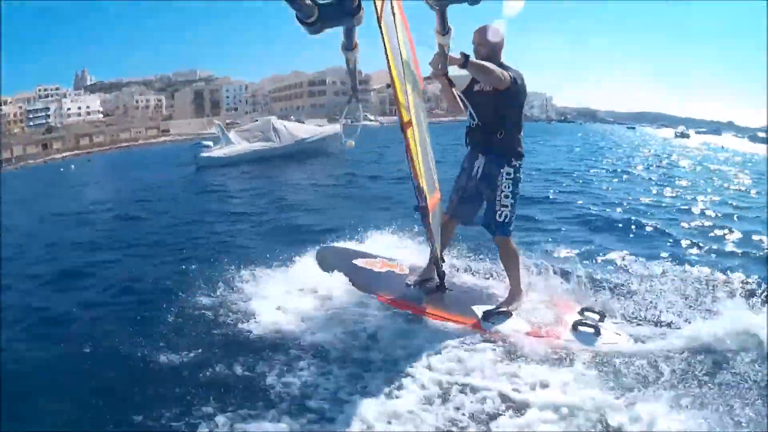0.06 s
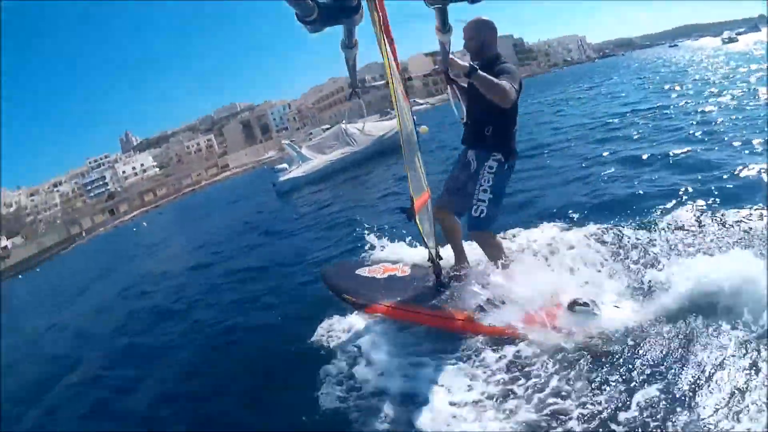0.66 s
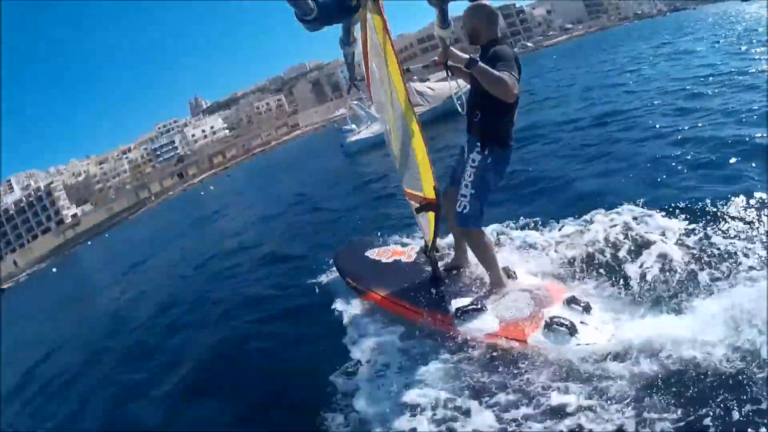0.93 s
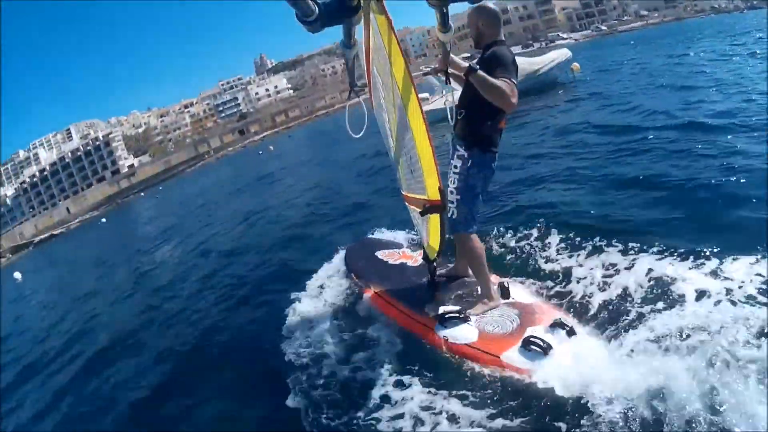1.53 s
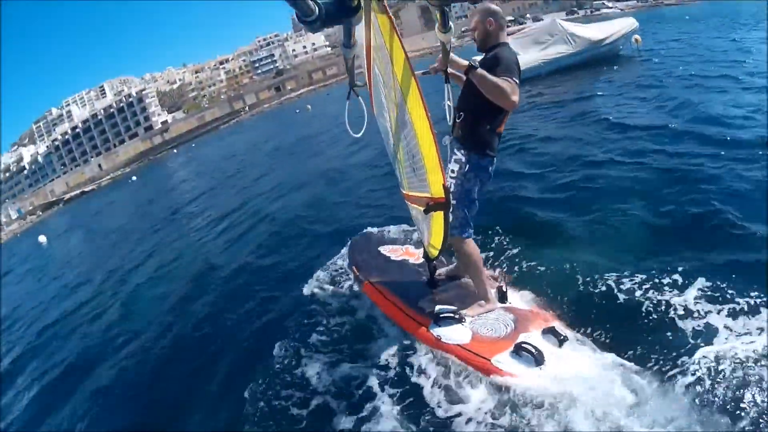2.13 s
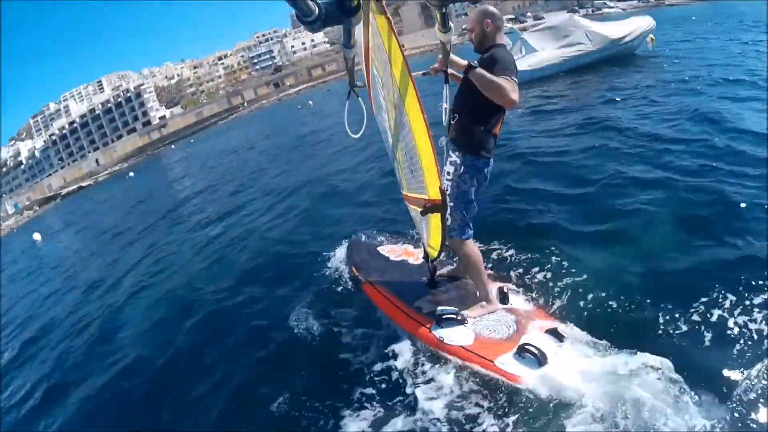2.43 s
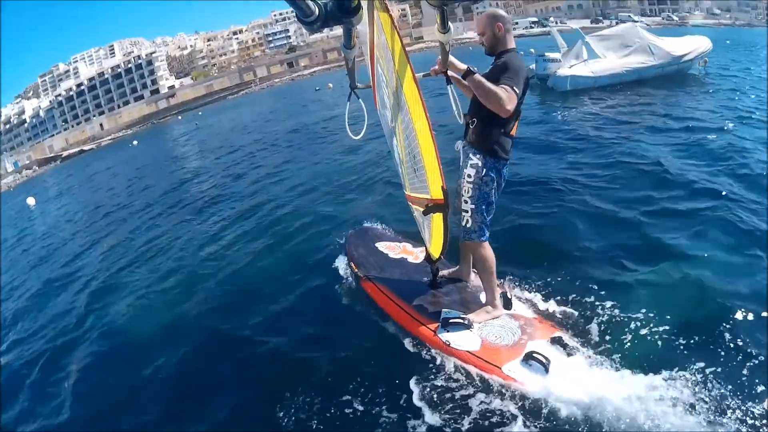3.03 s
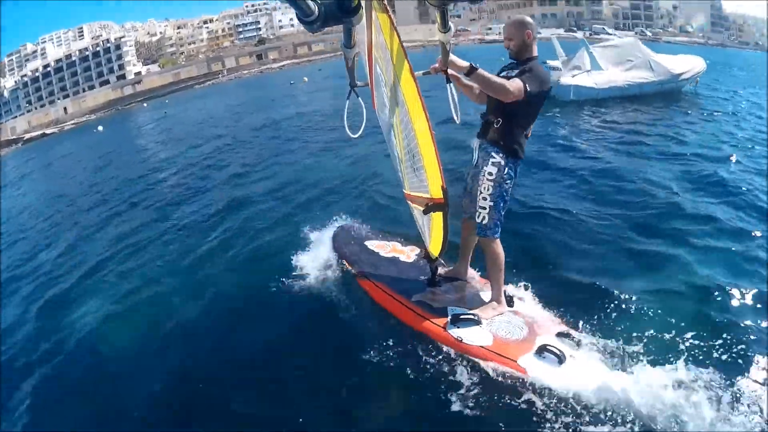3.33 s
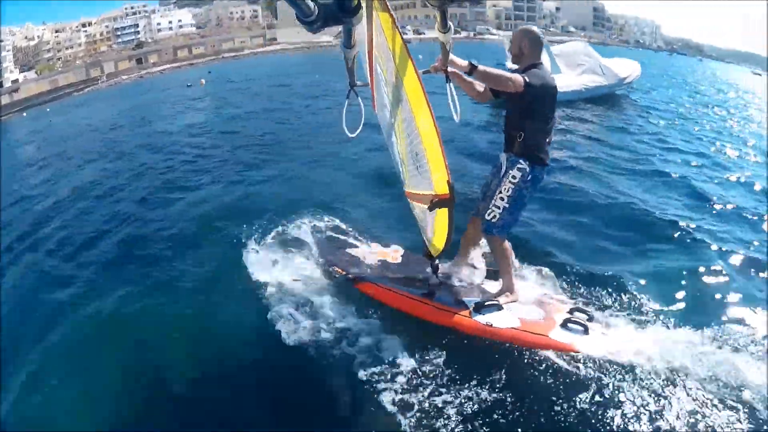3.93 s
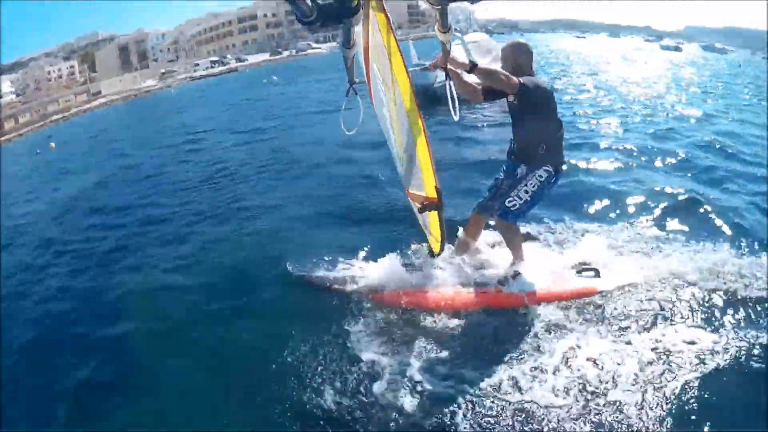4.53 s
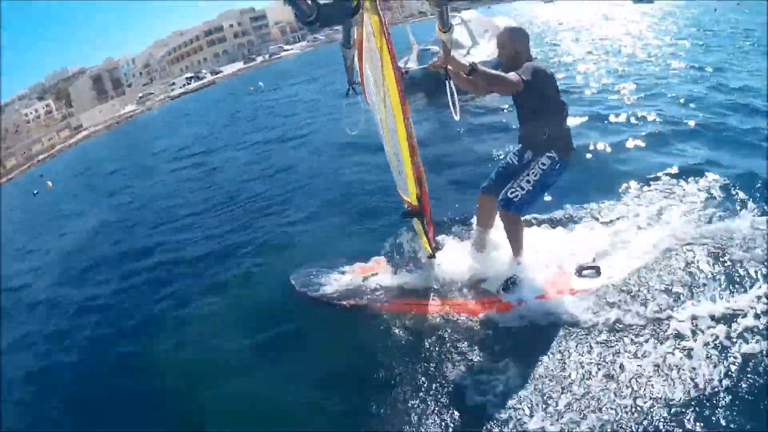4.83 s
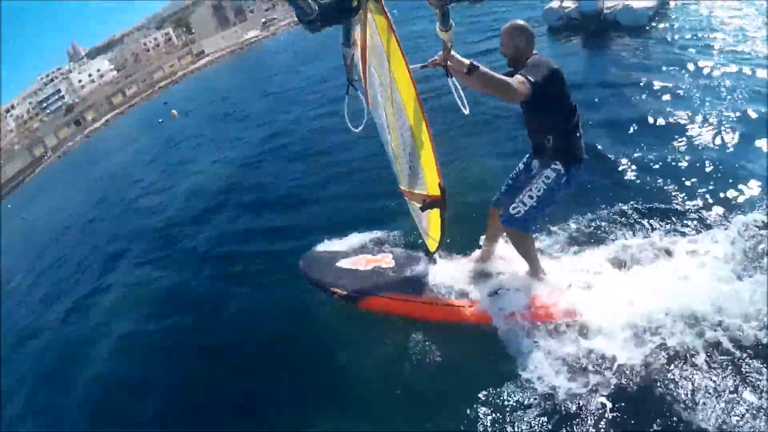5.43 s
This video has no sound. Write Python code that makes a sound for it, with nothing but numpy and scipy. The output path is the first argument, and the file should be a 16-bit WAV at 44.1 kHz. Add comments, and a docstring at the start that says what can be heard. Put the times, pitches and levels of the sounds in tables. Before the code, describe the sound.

A windsurf board skims over small chop on open water, heard from a sealed camera on the rig. Churning wash and buffeting wind come first, with hollow knocks through the mast, sharp drop ticks and small plops. The water and hiss then calm, broken by a short clatter. Later the rigging whistles faintly and knocks build to a crackling landing, then thin out over soft wash and wind.

```python
"""A windsurf board skims over small chop, heard from a sealed camera clamped to the rig.
It opens in churning wash and buffeting wind, with a run of knocks that travel up the mast as bending
waves and ring its hollow modes; drops tick on the case and air pockets plop under the hull. The ride
calms, the hiss steps down near 1.4 s, and a short clatter comes near 2.3 s. Near 4 s the rigging whistles
faintly and the knocks build to a crackling landing at 4.6 s, then thin out over wash, wind and hiss."""
import sys
import numpy as np
from scipy import signal
from scipy.fft import rfft, irfft, next_fast_len
from scipy.io import wavfile
from scipy.ndimage import uniform_filter1d, map_coordinates

SR = 44100
rng = np.random.default_rng(int(sys.argv[2]) if len(sys.argv) > 2 else 0)


def put_to_file(sound):
    """Save the sound as 16-bit audio at rate SR, in the file named by the first command-line argument."""
    columns = np.atleast_2d(sound).T  # one column per channel
    safe = np.clip(columns, -1, 1)
    whole_steps = np.round(safe * 32767)
    wavfile.write(sys.argv[1], SR, whole_steps.astype(np.int16))


N = 250047

# airflow over the case, rising and falling with the board's speed: (time [s], buffet level [dB])
AIRFLOW = [(0, -26.5), (0.15, -40), (0.38, -43), (0.55, -34), (0.81, -40), (0.91, -21.5), (1.02, -23),
           (1.15, -32.5), (1.72, -51.5), (2.2, -46), (2.62, -59.5), (3.5, -49), (3.85, -51.5), (4.25, -45),
           (4.72, -45), (5.03, -49.5), (5.3, -37.5), (5.67, -46)]
CRUISE_DB = -45  # an ordinary airflow


def amp(db):
    """Decibels to gain."""
    return 10 ** (np.asarray(db) / 20)


def unit(x):
    """Scale to rms 1."""
    return x / np.sqrt(np.mean(x ** 2) + 1e-20)


def along(points, hz):
    """Read (frequency [Hz], value) points on a log frequency axis."""
    freqs, values = np.transpose(points)
    return np.interp(np.log(hz + 1), np.log(freqs + 1), values)


def envelope(points):
    """Join (time [s], value) points into one value per sample."""
    times, values = np.transpose(points)
    return np.interp(np.arange(N) / SR, times, values)


def wobble(rate):
    """A smooth random curve, rate knots a second."""
    knots = rng.standard_normal(int(N * rate / SR) + 4)
    return map_coordinates(knots, [np.arange(N) * rate / SR])


def filtered(x, response):
    """Filter x with a complex response, given as a function of frequency."""
    size = 2 * next_fast_len(N // 2 + SR // 4)
    return irfft(rfft(x, size) * response(np.fft.rfftfreq(size, 1 / SR)), size)[:N]


def causal(gain):
    """The response with this gain that starts at once and then rings out."""
    cepstrum = irfft(np.log(gain + 1e-9))
    size = len(cepstrum)
    return np.exp(rfft(2 * cepstrum[:size // 2], size) - cepstrum[0])


def add(track, sound, s):
    """Mix a sound into the track from s seconds on."""
    start = round(s * SR)
    piece = sound[max(-start, 0):N - start]
    track[max(start, 0):][:len(piece)] += piece


def rush(spectrum, patchy_db):
    """Coloured noise of rms 1, with random patches of gain across time and frequency."""
    frames = signal.stft(rng.standard_normal(N), nperseg=512)[2]
    patches = uniform_filter1d(rng.standard_normal(frames.shape), size=5, axis=0)
    patches = uniform_filter1d(patches, size=9, axis=1)
    noise = signal.istft(frames * amp(patchy_db * unit(patches)), nperseg=512)[1][:N]
    return unit(filtered(noise, lambda hz: amp(along(spectrum, hz))))


def patter(rate, spread_db):
    """Random tiny impacts of uneven size, rate a second."""
    hits = rng.random(N) < rate / SR
    return hits * rng.standard_normal(N) * amp(spread_db * rng.standard_normal(N))


def rig(hz, vary_db):
    """Gain of the rig's modes; each place of impact drives them a little differently, by vary_db."""
    # modes of mast, boom and camera mount: (frequency [Hz], level [dB], t60 [s])
    modes = [(30, -6.5, 0.22), (56.1, -9, 0.076), (93.3, -5.5, 0.28), (133, -2, 0.13), (227.4, -7, 0.14),
             (297.7, 2, 0.11), (340.3, -5, 0.24), (437, -5, 0.066), (505.4, 3.5, 0.068), (573, -7, 0.046),
             (644, -10.5, 0.071), (808.5, -4, 0.056), (960, 1, 0.066), (1024, -3.5, 0.068),
             (1080, -11.5, 0.027), (1162, -6, 0.036), (1457, -5.5, 0.02), (1573, -19.5, 0.069),
             (1847, -18.5, 0.017), (2240, -31.5, 0.0086), (2680, -38.5, 0.013), (3500, -44, 0.03),
             (4000, -38.5, 0.016)]
    # share of a blow that the mast carries to the camera: (frequency [Hz], gain [dB])
    mast_eq = [(15, -19.5), (30, -4), (80, 4.5), (1700, 1.5), (2200, -1.5), (2700, -5.5), (3600, -1.5),
               (4300, -13), (5500, -38), (16000, -62)]
    power = 0
    for mode_hz, db, t60 in modes:
        offset = (hz - mode_hz) * 2 * np.pi * t60 / np.log(1000)  # in half-widths
        peak = 1 / (1 + offset ** 2) / np.sqrt(1 + (offset / 3) ** 2)  # steep skirts, dark valleys
        power = power + amp(db + vary_db * rng.standard_normal()) ** 2 * peak
    return np.sqrt(power) * amp(along(mast_eq, hz))


def bending(hz, delay_at_1khz=.004):
    """Bending waves are faster at high pitch, so a blow arrives as a quick downward chirp."""
    phase = 4 * np.pi * delay_at_1khz * np.sqrt(1000 * hz)
    # paths of unequal length blur the front of the higher waves over a few milliseconds
    blur = map_coordinates(rng.standard_normal(90), [hz / 260]) * np.minimum(hz / 750, 1.8)
    return np.exp(-1j * (phase + blur))


def blow(drive, size, scatter_db=-6.5, scatter_t60=.035, level_window_s=.005):
    """One hit through the mast: the direct wave, then a cloud of weak reflections from the fittings."""
    hz, t = np.fft.rfftfreq(size, 1 / SR), np.arange(size) / SR
    echoes = rng.standard_normal(size) * amp(-60 * t / scatter_t60)
    paths = 1 + amp(scatter_db) * rfft(echoes / np.linalg.norm(echoes))
    hit = irfft(causal(drive) * paths * bending(hz))
    gain = np.sqrt(level_window_s * SR)  # a hit's level is its energy spread over this window
    return gain * np.roll(hit, size // 32)  # pre-roll keeps the blurred attack whole


def hiss_and_whistle(whistle_hz=3630, half_width_hz=210, flutter_db=0.82):
    """Fine hiss of spray and recorder, with a faint airy whistle in the rigging."""
    # fine hiss, stepping down near 1.4 s as the camera's microphone switches: (time [s], level [dB])
    hiss_levels = [(0, -48), (0.28, -48), (0.5, -54), (0.72, -50.5), (0.98, -48), (1.36, -50.5),
                   (1.45, -58.5), (3.1, -60), (4.3, -57), (4.52, -50.5), (4.7, -56.5), (5.05, -57.5),
                   (5.2, -54.5), (5.67, -53.5)]
    # colour of the hiss: (frequency [Hz], spectral level [dB])
    hiss_eq = [(300, 3), (600, -1), (1000, -9.5), (1500, -7), (2300, -9), (3700, -14), (5200, -16.5),
               (8200, -18.5), (10200, -16.5), (12000, -20), (14800, -22.5), (16000, -25.5)]
    # the rigging's whistle, which returns once the board is on its new course: (time [s], level [dB])
    whistle_levels = [(0, -67), (1.6, -84.5), (3.85, -78), (4.1, -66), (4.6, -69), (5.0, -80), (5.3, -67),
                      (5.67, -64.5)]
    resonance = lambda hz: 1 / (1 + ((hz - whistle_hz) / half_width_hz) ** 2)
    whistle = unit(filtered(rng.standard_normal(N), resonance))
    hiss = rush(hiss_eq, patchy_db=.6)
    hiss_db = envelope(hiss_levels) + flutter_db * wobble(21)
    whistle_db = envelope(whistle_levels) + wobble(12)
    return amp(hiss_db) * hiss + amp(whistle_db) * whistle


def wind(cruise_sway_db=-47.5, sway_db_per_db=1.134):
    """Lumpy air pressure buffets the case and sways the rig's lowest modes."""
    # rumble of air on the case: (frequency [Hz], spectral level [dB])
    buffet_eq = [(12, -24), (28, 10), (50, -13), (70, -6), (110, -10.5), (200, -30), (400, -51.5),
                 (900, -81)]
    # the air pushes too slowly to drive the higher modes: (frequency [Hz], gain [dB])
    push = [(40, -28), (60, -5.5), (90, 0.5), (140, -0.5), (200, -7), (300, -15.5), (500, -27.5),
            (1000, -45.5)]
    buffet_db = envelope(AIRFLOW)
    sway_db = cruise_sway_db + sway_db_per_db * (buffet_db - CRUISE_DB)
    low_modes = lambda hz: rig(hz, vary_db=0) * amp(along(push, hz))
    sway = unit(filtered(rng.standard_normal(N), low_modes))
    buffet = rush(buffet_eq, patchy_db=-1.5)
    return amp(buffet_db) * buffet + amp(sway_db) * sway


def churn(cruise_wake_db=-58.5, wake_db_per_db=0.55, rise_s=.04):
    """Envelope of the wash: a wake that follows the speed, plus a surge for each wave."""
    # waves the board ploughs through: (start [s], level [dB], hold from start [s], fall [dB/s])
    surges = [(-0.02, -21, 0.043, 126), (0.198, -31.5, 0.068, 68.5), (0.464, -30, 0.27, 190),
              (0.816, -26.5, 0.16, 49), (0.86, -16.5, 0.023, 150), (1.088, -33, 0.088, 89.5),
              (4.1, -45.5, 0.04, 70), (4.57, -46.5, 0.14, 20), (5.096, -40.5, 0.055, 82),
              (5.287, -39.5, 0.032, 49)]
    t = np.arange(N) / SR
    power = amp(cruise_wake_db + wake_db_per_db * (envelope(AIRFLOW) - CRUISE_DB)) ** 2
    for start, db, hold, fall in surges:
        rise = np.clip((t - start) / rise_s, 0, 1)
        surge = rise * amp(db - fall * np.maximum(t - start - hold, 0))
        power = power + surge ** 2
    return np.sqrt(power)


def wash(gurgle_db=1.76, foam_db=-7):
    """Water churns against the hull: a soft rush of foam plus countless little slaps that ring the rig."""
    # colour of the foam: (frequency [Hz], spectral level [dB])
    foam_eq = [(90, -21.5), (140, -19), (195, -2.5), (300, 2), (380, -30), (500, -9), (720, -4.5),
               (810, -12.5), (1000, -17.5), (1300, -5.5), (1500, -14.5), (2200, -27.5), (3700, -30),
               (6000, -47.5)]
    # softness of a slap: (frequency [Hz], gain [dB])
    slap_eq = [(100, 1), (300, 7), (500, -1.0), (1200, -1.5), (2500, 6.5), (4000, 10.5)]
    hollow = lambda hz: causal(rig(hz, vary_db=0) * amp(along(slap_eq, hz))) * bending(hz)
    slaps = unit(filtered(patter(rate=300, spread_db=2), hollow))
    foam = rush(foam_eq, patchy_db=3.5)
    return churn() * amp(gurgle_db * wobble(25)) * (slaps + amp(foam_db) * foam)


def plops(pitch_rise=0.44, attack_s=0.00085):
    """A trapped air pocket rings briefly, its pitch rising as it nears the surface."""
    # air pockets closing under the hull: (time [s], starting pitch [Hz], level [dB], t60 [s])
    pockets = [(0.732, 1370, -14.5, 0.044), (0.795, 1340, -26, .03), (0.807, 1516, -0.5, 0.0085),
               (1.842, 1295, -40.5, 0.045), (2.8, 1320, -39.5, 0.017), (2.819, 1647, -23, 0.016),
               (4.526, 1360, -29.5, 0.065)]
    out, t = np.zeros(N), np.arange(SR // 8) / SR
    attack = 1 - np.exp(-(t / attack_s) ** 2)
    for s, hz, db, t60 in pockets:
        pitch = hz * (1 + pitch_rise * (1 - np.exp(-2 * t / t60)))
        ring = np.sin(2 * np.pi * np.cumsum(pitch) / SR) * amp(-60 * t / t60)
        add(out, amp(db) * attack * ring, s)
    return out


def ticks(size=2048):
    """Millisecond ticks: drops hit the stiff case, and one tick stands for an overload crackle."""
    # drops on the case, and at 4.565 s the crackle of the loudest knock overloading the camera:
    # (time [s], peak [dB])
    hits = [(0.7525, 0), (0.9259, -28), (1.0221, -4.5), (3.787, -41.5), (3.911, -27.5), (4.565, -22),
            (5.1197, -35)]
    # colour of a tick: (frequency [Hz], gain [dB])
    tick_eq = [(200, -24.5), (1400, -10), (2800, -11.5), (3650, -10.5), (4350, 2), (5600, -9),
               (7400, -11.5), (7850, -27), (8900, -19.5), (10200, -34.5), (12500, -36.5), (16000, -52.5)]
    hz = np.fft.rfftfreq(size, 1 / SR)
    tick = irfft(causal(amp(along(tick_eq, hz))))
    tick = tick / np.abs(tick).max()
    out = np.zeros(N)
    for s, db in hits:
        add(out, amp(db) * tick, s)
    return out


def thumps(size=16384, lead_s=0.0024):
    """Water cushions the hull as it lands, so mainly the rig's low modes answer."""
    # landings on wavelets, felt through the mast foot: (time [s], level [dB], firmness [dB])
    landings = [(0.028, -20.5, 10), (1.855, -27, -1), (2.119, -32, -4), (2.3422, -15.5, 13.5),
                (3.929, -26, -8), (4.102, -23, 3), (4.49, -22.5, -12), (4.564, -10, -14)]
    # soft push of the water: (frequency [Hz], gain [dB])
    cushion_eq = [(170, 2), (290, -9.5), (480, -28.5), (900, -33), (2000, -47.5)]
    out, hz = np.zeros(N), np.fft.rfftfreq(size, 1 / SR)
    for s, db, firm_db in landings:
        firm_shelf = [(170, 0), (290, firm_db)]
        drive = rig(hz, vary_db=1) * amp(along(cushion_eq, hz) + along(firm_shelf, hz))
        thump = blow(drive / np.linalg.norm(irfft(drive)), size)
        add(out, amp(db) * thump, s - lead_s - size // 32 / SR)
    return out


def knocks(size=16384, lead_s=.0021, bass_db=-3, crack_per_snap=2.17):
    """Each knock rings the rig: broad contacts sound hollow, hard ones snap."""
    # hard knocks reaching the mast: (time [s], level [dB], body boost [dB], snap boost [dB])
    hits = [(0.003, -20, 4.5, -1), (0.028, -14, -3, 5), (0.064, -13.5, 1.5, 1), (0.168, -24, -3, 13.5),
            (0.21, -23, -11, 6.5), (0.245, -33, 12.5, -9), (0.341, -41, 18, -1), (0.41, -33, 0.5, 10.5),
            (0.487, -22.5, -6, 4), (0.511, -21, 8.5, -15), (0.583, -16.5, -21, -23), (0.622, -21, -16, 3),
            (0.632, -23, -5, -9), (0.702, -21.5, -11, -1), (0.733, -22.5, -12, 9), (0.809, -21.5, -6, 12),
            (0.836, -15.5, -11, 1), (0.934, -25.5, -2, 14), (0.982, -11, -17, 10.5), (1.201, -22, -8.5, 6),
            (2.118, -30, 7, -0.5), (2.2, -44, 8, 9), (2.305, -34, 3.5, -1), (2.3224, -19, 2.5, 3.5),
            (2.3421, -14.5, 0, 1), (2.363, -18.5, 7, 4), (2.819, -25, -7, 5.5), (2.946, -34, -6, 3),
            (3.786, -42.5, 6, 11.5), (3.893, -40, -1.5, -2), (3.904, -31.5, 0, 7), (3.92, -31.5, -9.5, 6),
            (3.932, -27.5, 5, 9.5), (4.066, -38, 5, 6), (4.102, -18.5, 2, 0), (4.11, -22, -3, 3),
            (4.162, -38, 2, 11.5), (4.402, -32, -1.5, 6), (4.413, -31, -4, 1), (4.432, -21.5, -4, 2.5),
            (4.45, -26, -8, 5), (4.465, -17.5, -1, 2.5), (4.475, -22, -4, 4.5), (4.49, -9, -3.5, -0.5),
            (4.564, -6, 1.5, 6), (4.824, -33, -2.5, 14.5), (4.878, -21, -9, 4), (4.902, -26.5, -2, 5.5),
            (5.12, -32, -1, 14), (5.2, -42.5, 7, 4), (5.377, -38, 13.5, 2)]
    out, hz = np.zeros(N), np.fft.rfftfreq(size, 1 / SR)
    for s, db, body_db, snap_db in hits:
        modes = rig(hz, vary_db=1)
        contact_eq = [(170, bass_db), (300, body_db), (480, body_db), (900, 0), (1400, 0),
                      (2000, snap_db), (3800, snap_db * crack_per_snap)]
        drive = modes / np.linalg.norm(irfft(modes)) * amp(along(contact_eq, hz))
        add(out, amp(db) * blow(drive, size), s - lead_s - size // 32 / SR)
    return out


def scene():
    """Mono mix at the camera: the hits over a bed of wash, wind and hiss."""
    return (knocks() + thumps() + plops() + ticks() + wash() + wind() + hiss_and_whistle())[None]


def record(dry, top_hz=15700):
    """The camera rounds off peaks near full scale and keeps nothing above its band limit."""
    soft_clipped = dry[0] / (1 + dry[0] ** 8) ** (1 / 8)
    return filtered(soft_clipped, lambda hz: hz < top_hz)[None]


dry = scene()
out = record(dry)
put_to_file(out)
```